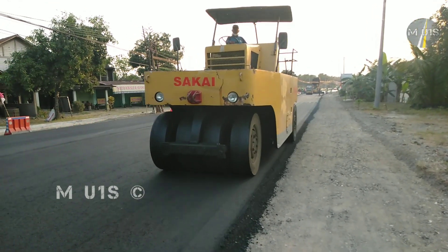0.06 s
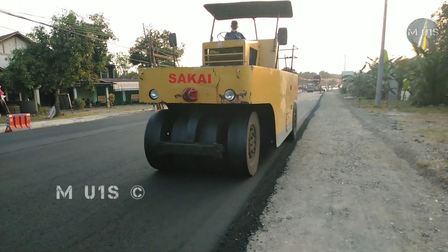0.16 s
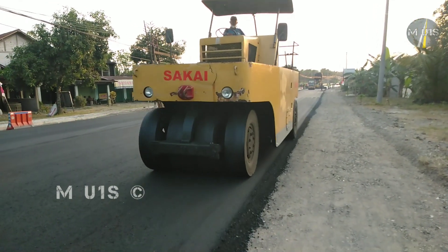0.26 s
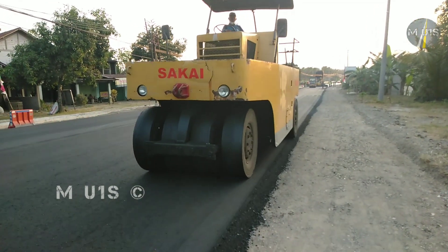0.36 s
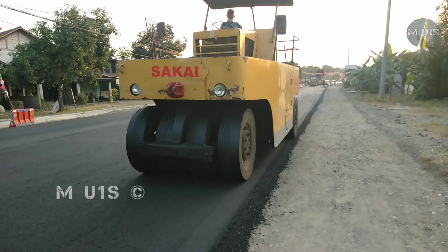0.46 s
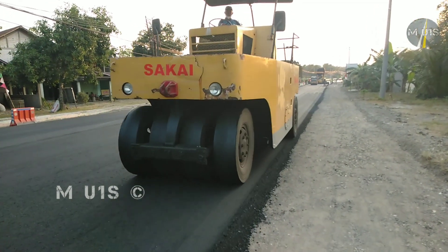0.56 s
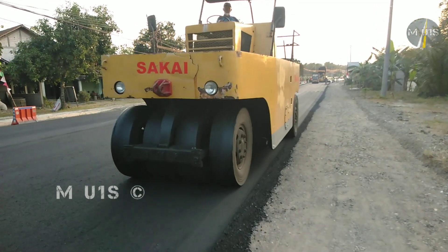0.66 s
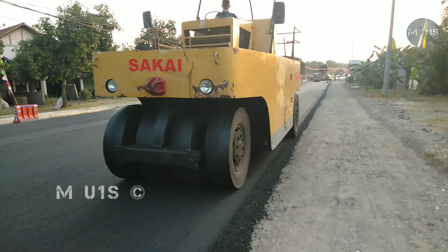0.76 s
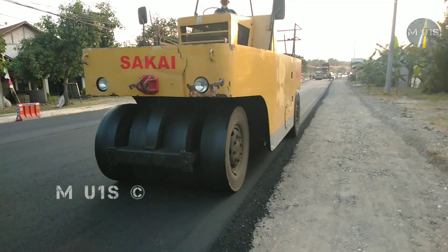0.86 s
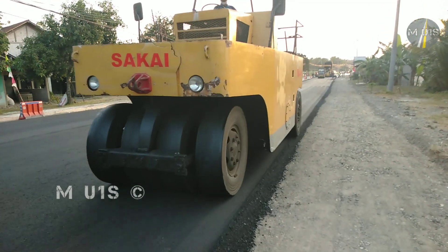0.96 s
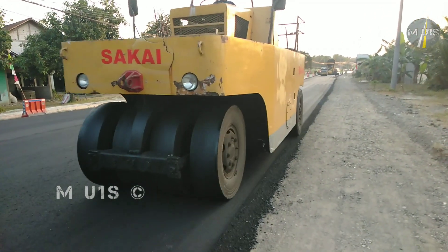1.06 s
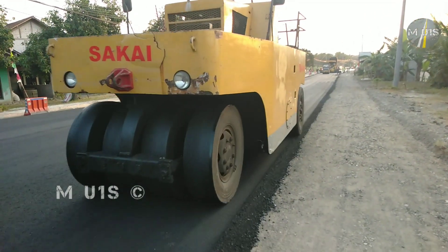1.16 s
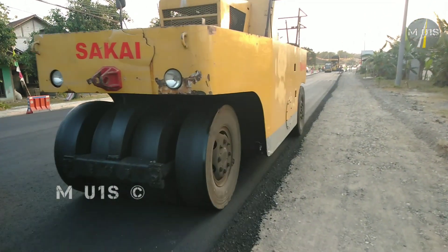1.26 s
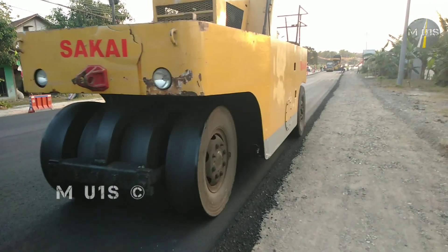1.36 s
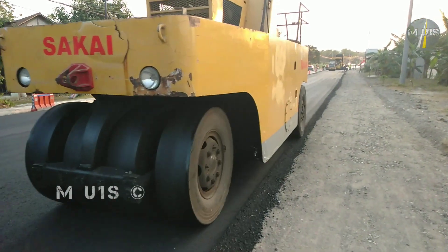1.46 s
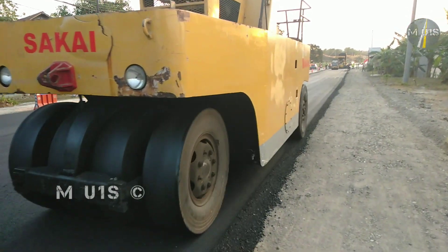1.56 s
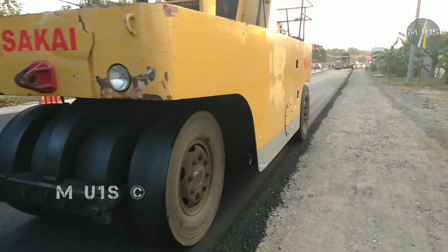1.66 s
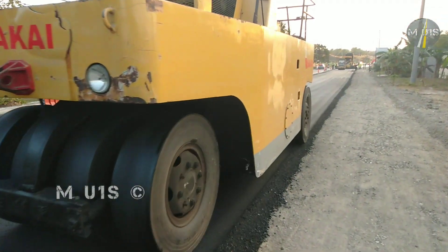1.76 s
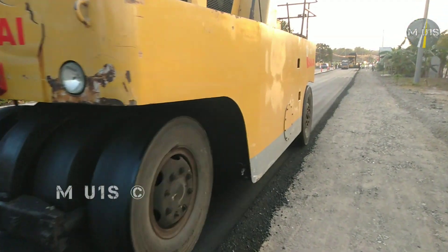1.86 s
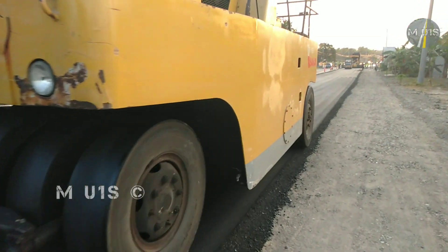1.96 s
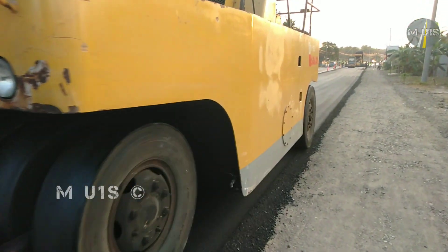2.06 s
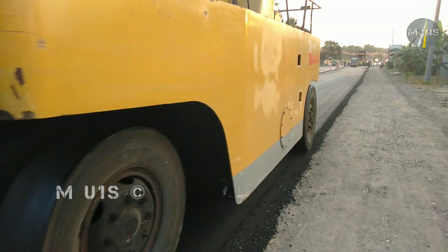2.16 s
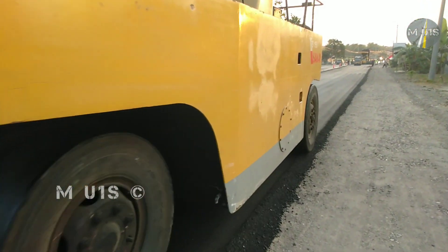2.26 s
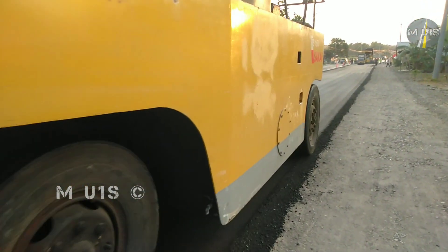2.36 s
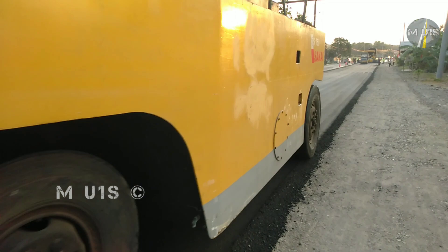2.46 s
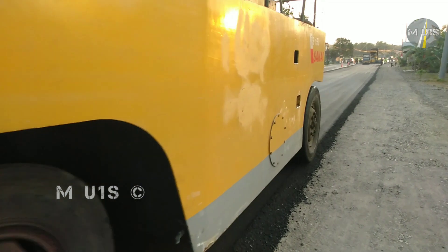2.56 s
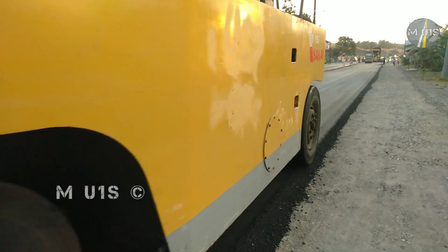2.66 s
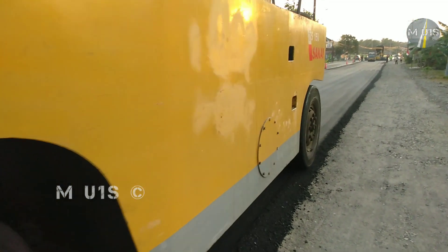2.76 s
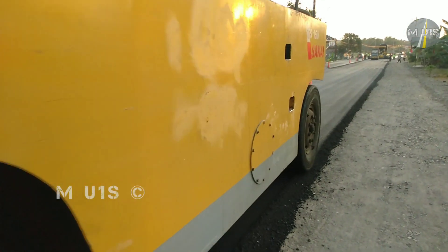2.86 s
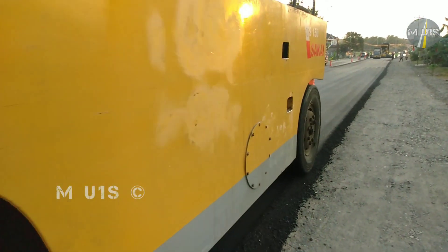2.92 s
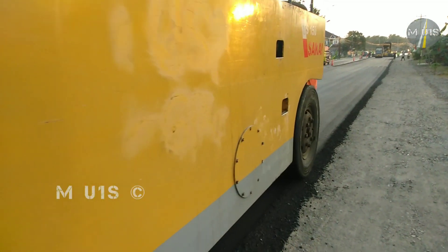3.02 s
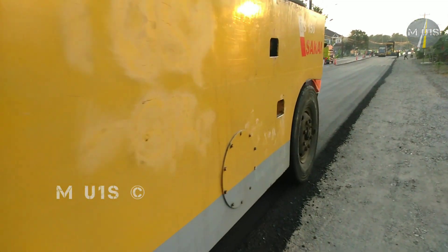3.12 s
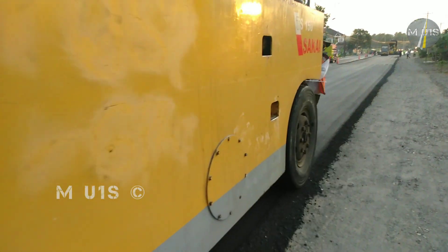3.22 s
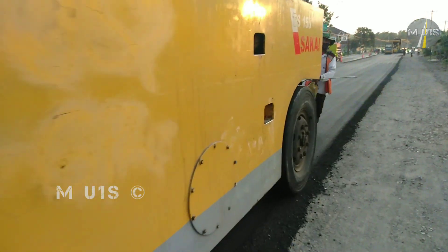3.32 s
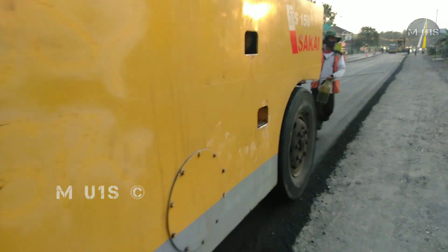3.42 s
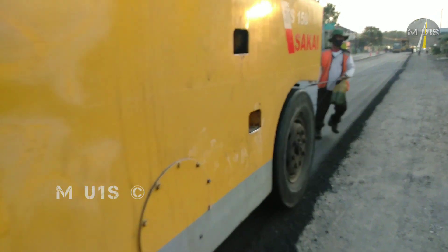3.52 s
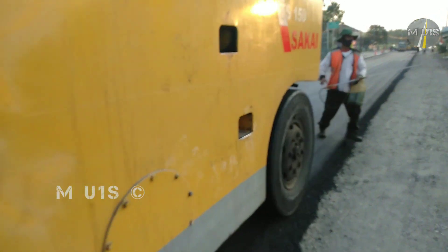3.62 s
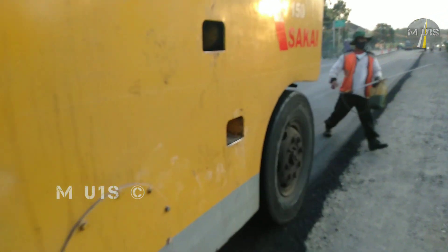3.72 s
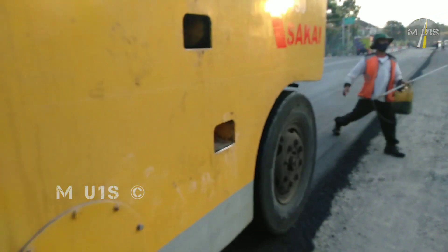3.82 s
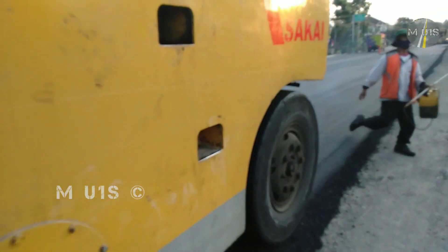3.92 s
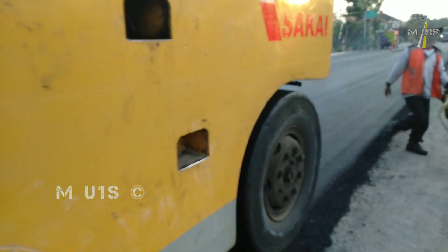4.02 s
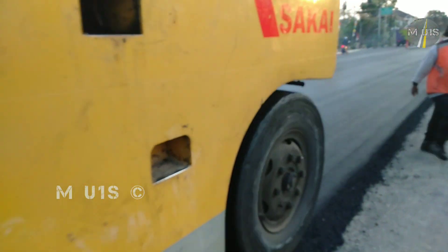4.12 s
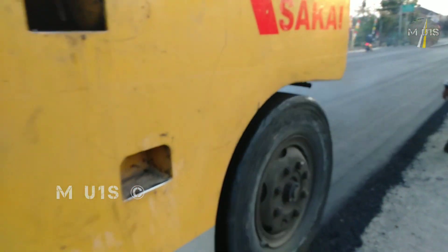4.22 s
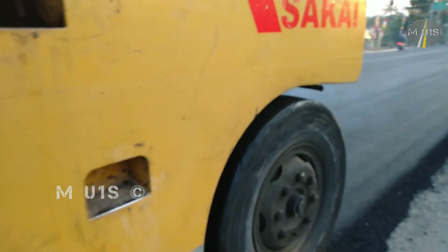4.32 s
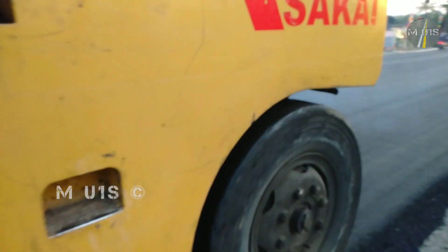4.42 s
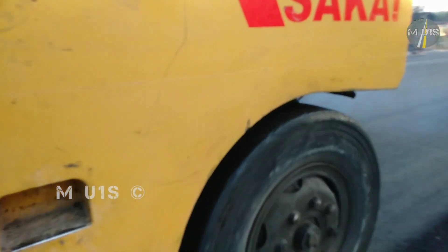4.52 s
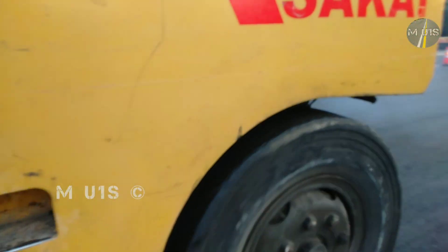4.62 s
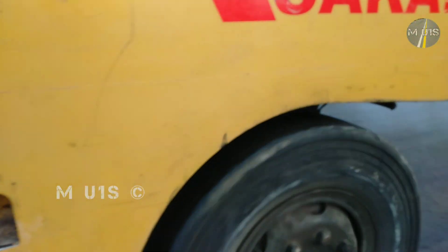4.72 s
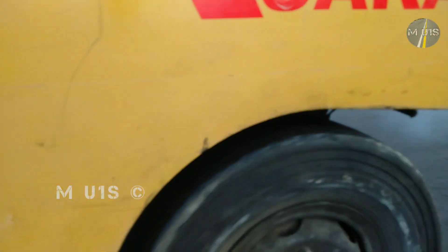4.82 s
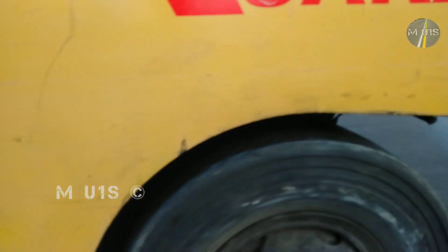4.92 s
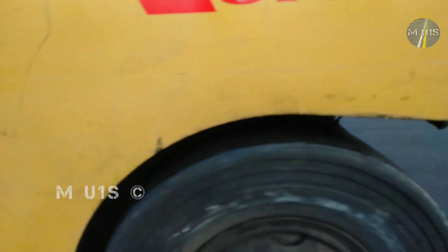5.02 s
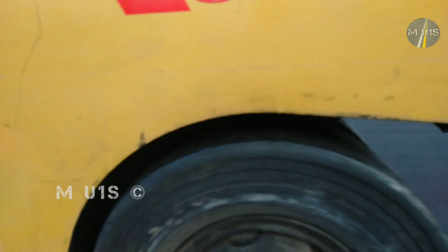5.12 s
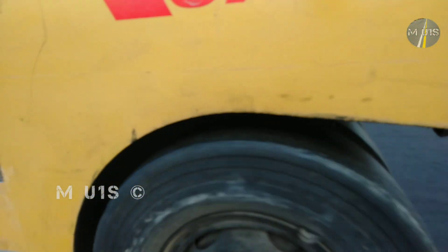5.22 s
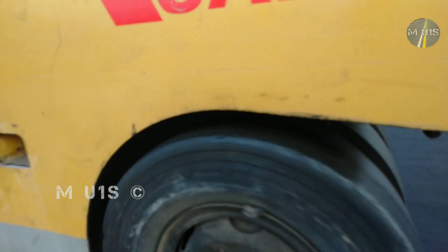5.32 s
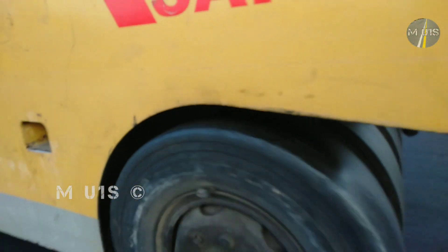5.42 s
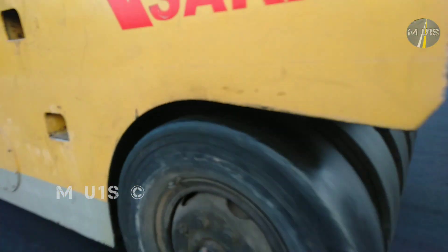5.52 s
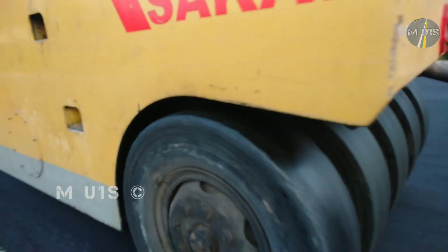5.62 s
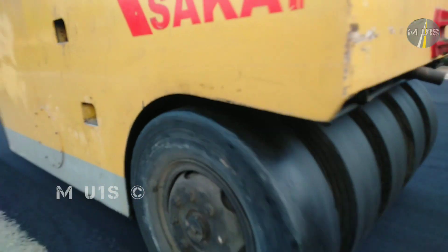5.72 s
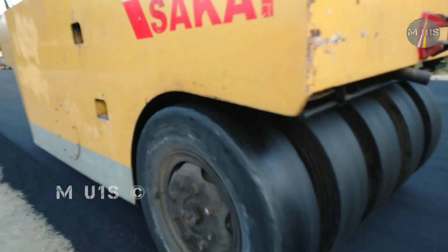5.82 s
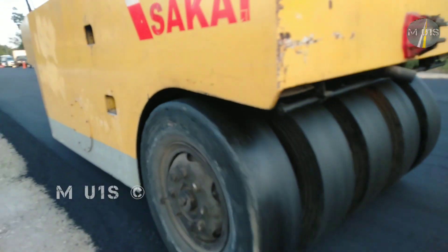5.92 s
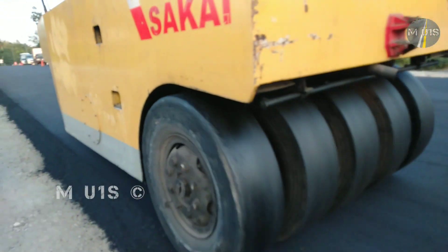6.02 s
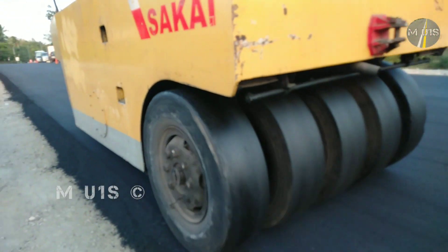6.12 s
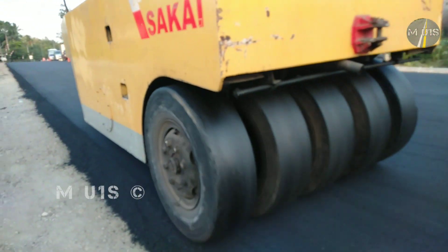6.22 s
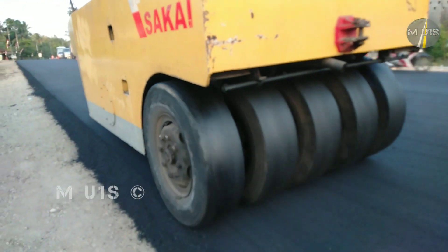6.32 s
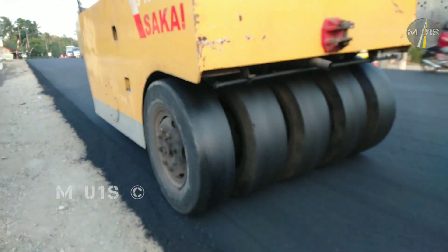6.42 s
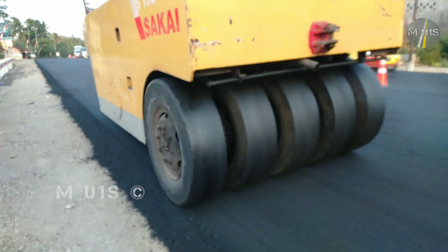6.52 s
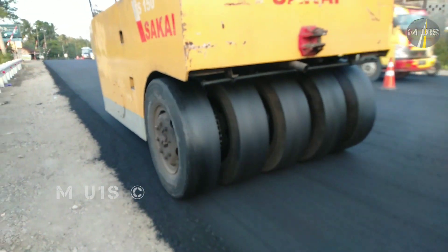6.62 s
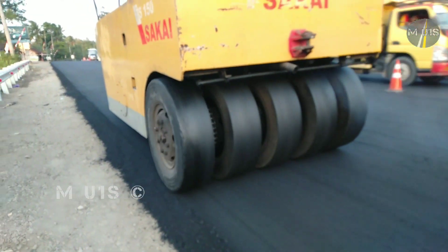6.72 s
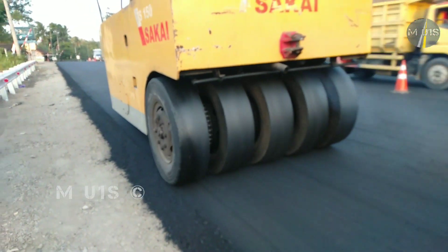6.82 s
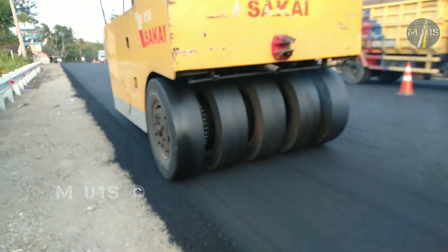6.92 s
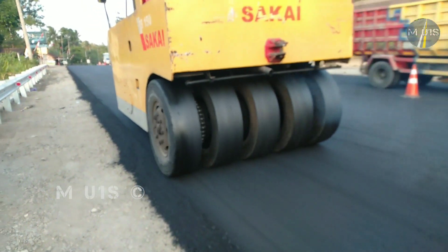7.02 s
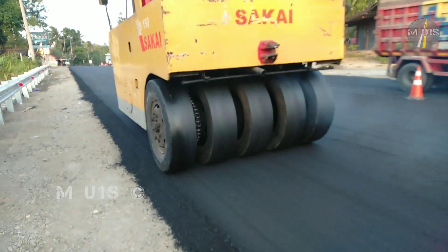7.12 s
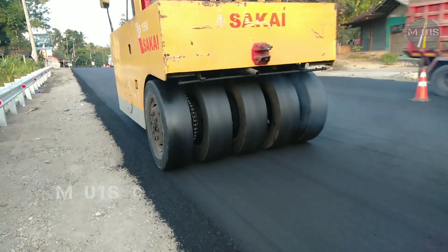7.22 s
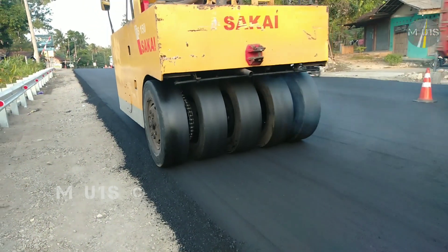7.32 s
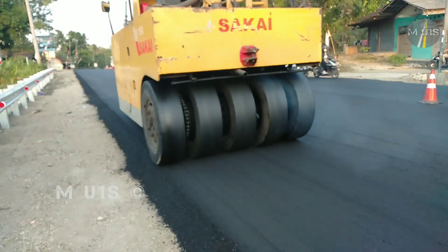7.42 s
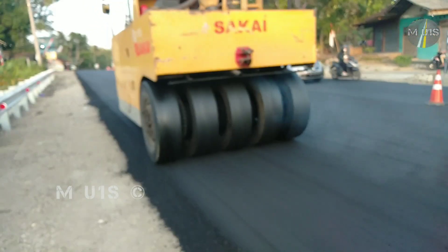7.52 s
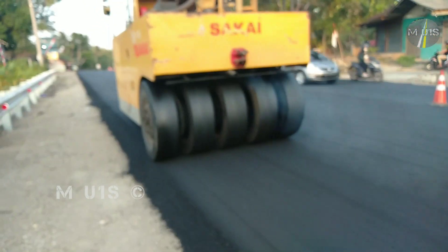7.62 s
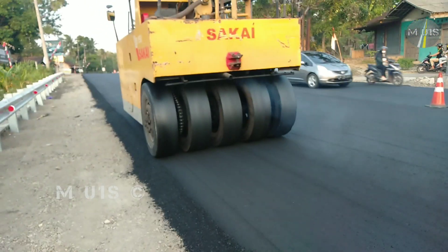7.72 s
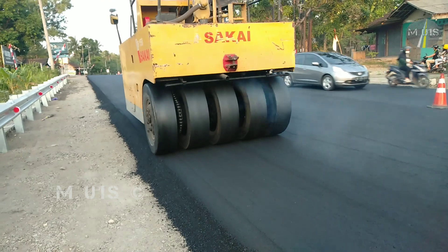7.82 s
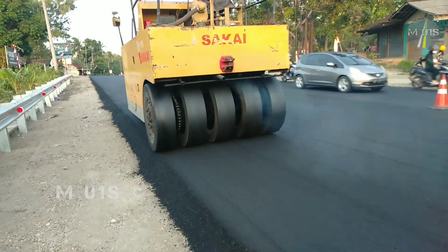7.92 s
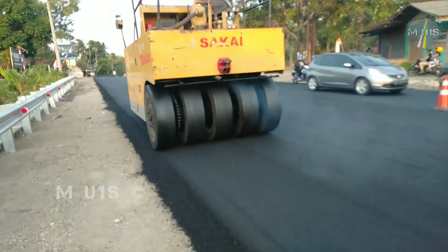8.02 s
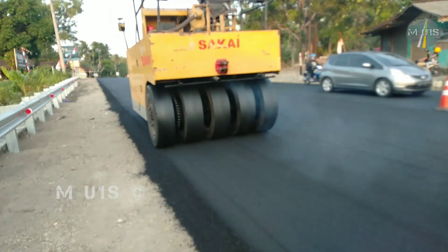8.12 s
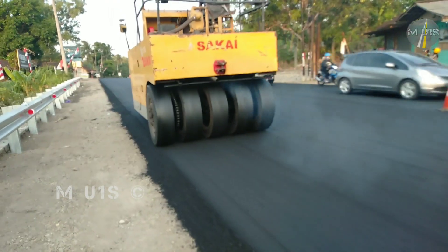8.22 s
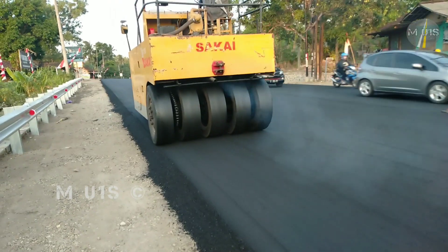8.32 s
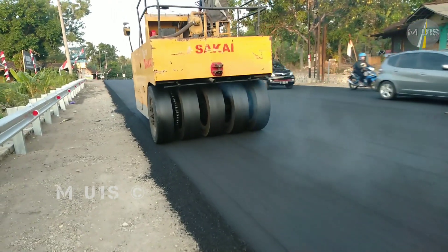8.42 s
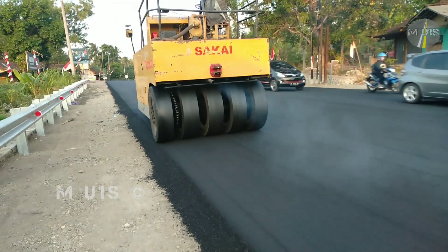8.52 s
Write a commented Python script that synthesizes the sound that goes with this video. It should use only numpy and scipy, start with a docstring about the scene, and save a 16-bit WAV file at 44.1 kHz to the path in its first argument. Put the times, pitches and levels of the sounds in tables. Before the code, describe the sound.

A heavy six-cylinder engine holds one speed while the machine rolls by within a couple of metres, in open air. Fan and pump hums waver around its deep throbbing drone. Clatter, valve tapping and fine ticking peak abreast, with a mid-pitched whine surging in bursts. The engine fades gradually behind brief groans and squeaky chirps, while a lorry's drone and soft car roar pass farther off.

```python
"""A rubber-tyred road roller creeps past, close to the microphone, its six-cylinder diesel held near one speed.
The exhaust hums in firing harmonics; noise shaped by engine blows makes body boom, clatter and a sharp tick.
A fan, a pump and a surging drive whine are wavering tones; resonances swell, hard knocks ring, fittings clank.
The tyres hiss on fresh asphalt, with passages of narrow-band hiss; faint groans and a dry squeak come late.
Behind it, in the open lane, a lorry and a car go by towards the end."""
import sys
import numpy as np
from scipy import signal
from scipy.fft import rfft, irfft, next_fast_len
from scipy.io import wavfile

SR = 44100
rng = np.random.default_rng(int(sys.argv[2]) if len(sys.argv) > 2 else 0)


def log_audio(samples):
    """Write samples as a 16-bit WAV file to the path given in sys.argv[1]."""
    # one column per channel
    frames = np.atleast_2d(samples).T
    # limit to full scale, then quantise
    limited = np.clip(frames, -1, 1)
    pcm = np.round(limited * 32767).astype(np.int16)
    wavfile.write(sys.argv[1], SR, pcm)


N = 377937
CYLINDERS = 6


def from_db(db):
    """Decibels to gain."""
    return 10 ** (np.asarray(db) / 20)


def rms_one(x):
    """Scale to unit power."""
    return x / np.sqrt(np.mean(x ** 2) + 1e-20)


def in_time(rows):
    """Read each column of a curve at every sample; the first column is in seconds."""
    s, *columns = np.transpose(rows)
    return [np.interp(np.arange(N) / SR, s, c) for c in columns]


def coloured(x, spectrum):
    """Filter a sound to a spectrum of relative levels, falling away below its first row; rms 1."""
    hz, db = np.transpose(spectrum)
    size = next_fast_len(N + 4096)
    freqs = np.arange(size // 2 + 1) * SR / size
    gain = from_db(np.interp(np.log(freqs + 1e-3), np.log(hz), db))
    gain = gain * np.minimum(freqs / hz[0], 1) ** 2
    return rms_one(irfft(rfft(x, size) * gain, size)[:N])


def band_noise(hz, width_hz):
    """Noise in one band; rms 1."""
    edges = [hz - width_hz / 2, hz + width_hz / 2]
    band = signal.butter(2, edges, "band", fs=SR, output="sos")
    return rms_one(signal.sosfilt(band, rng.standard_normal(N)))


def drift(rate):
    """Slow random wander of rms 1; a higher rate wanders faster."""
    r = np.exp(-200 * np.pi * rate / SR)   # one step per 100 samples
    steps = rng.standard_normal(N // 100 + 1002)
    slow = signal.lfilter([1], [1, -2 * r, r * r], steps)[1000:]   # drop the filter's start
    return np.interp(np.arange(N) / 100, np.arange(len(slow)), rms_one(slow))


def tone(turns, flutter, rate):
    """A line of rms 1 whose height and phase are shaken at random."""
    angle = 2 * np.pi * (turns + rng.random())
    in_phase = (1 + flutter * drift(rate)) * np.cos(angle)
    return rms_one(in_phase + flutter * drift(rate) * np.sin(angle))


def swell(start_s, end_s, edge_s):
    """Rise, hold and release, with soft edges."""
    t = np.arange(N) / SR
    rise = (1 + np.tanh((t - start_s) / edge_s / 2)) / 2
    release = (1 - np.tanh((t - end_s) / edge_s / 2)) / 2
    return rise * release


def together(gains):
    """Unrelated sounds add in power."""
    return np.sqrt(sum(gain ** 2 for gain in gains))


ROLLER_M_PER_S, TRAFFIC_M_PER_S = 1.33, 8.6


def passing(part, speed=ROLLER_M_PER_S):
    """Gain of a source moving along a straight line past the microphone."""
    abreast_s, db, distance_m, coming_db, going_db = part
    along_m = speed * (np.arange(N) / SR - abreast_s)
    doublings = np.log2(np.hypot(1, along_m / distance_m))
    return from_db(db - np.where(along_m < 0, coming_db, going_db) * doublings)


# Engine speed. Each row: time in seconds, firings per second.
FIRING = [(0.25, 52.12), (0.75, 52.1), (1.25, 52.31), (1.75, 52.16), (2.25, 52.0), (2.75, 51.75),
          (3.25, 51.91), (3.75, 51.79), (4.25, 51.26), (4.75, 51.42), (5.25, 50.98), (5.75, 51.09),
          (6.25, 51.45), (6.75, 51.35), (7.25, 51.12), (7.75, 51.36), (8.25, 51.36)]


def crankshaft():
    """Count engine cycles from the firing rate; every cylinder fires once a cycle."""
    return np.cumsum(in_time(FIRING)[0]) / SR / CYLINDERS


def throbbing(cycles, depth, position):
    """Gain that rises and falls once in each engine cycle."""
    return 1 + depth * np.cos(2 * np.pi * (cycles - position))


# The deepest hum, one line at the firing rate, going by the microphone.
# The row: abreast at seconds, dB there, distance in m, dB lost per doubling of distance coming, and going.
FIRING_HUM_PASS = (3.9, -31.5, 1.3, 6, 3.5)
# A brief dip in that hum. The row: start in seconds, end in seconds, dB.
HUM_DIP = (7.37, 7.8, -20)
# The main hum at twice the firing rate. Each row: time in seconds, level in dB before the throb.
MAIN_HUM = [(0, -30), (.35, -27), (1.0, -32), (1.5, -27.5), (2.4, -29.5), (3.3, -32), (4.2, -33),
            (4.75, -29.5), (5.4, -44), (6.0, -33.5), (6.7, -31.5), (8.57, -36.5)]
# Throb of these two hums. Each row: time in seconds, depth 0-1, position of its peak in the cycle 0-1.
HUM_THROB = [(0, .15, 0.33), (2.2, .17, 0.45), (3, 0.1, .69), (4.4, .15, 0.6), (6, 0, 0.6)]
# Higher harmonics along the flank. Each row: multiple of the firing rate, start in seconds, end in seconds,
# level in dB before the throb.
HUM_SWELLS = [(3, 0.21, 4.1, -42), (3, 2.62, 4.47, -29), (3, 8.12, 8.6, -38), (4, 2.14, 3.8, -40.5),
              (4, 3.9, 4.82, -33), (4, 4.63, 6.4, -41.5), (5, 4.9, 8.6, -43.5)]
HUM_EDGE_S = 0.13
# Lines left between the harmonics by unequal cylinders. Each row: multiple of the cycle rate, level in dB;
# the trailing throb's gain is added to multiples 7 to 11.
UNEVEN = [(5, -49), (7, -46), (8, -44.5), (9, -46), (10, -49.5), (11, -54), (13, -50.5), (14, -49),
          (16, -48), (20, -45), (22, -52.5), (30, -51)]
# The low throb trailing the machine. The row: abreast at seconds, dB added to each line's own,
# distance in m, dB lost per doubling of distance coming, and going.
THROB_PASS = (6.1, 3.7, 1.75, 3, 5.9)


def exhaust(cycles):
    """Firing pulses hum through the silencer; cylinder differences add lines that make the hum throb."""
    dip_start, dip_end, dip_db = HUM_DIP
    deepest_gain = passing(FIRING_HUM_PASS) * from_db(dip_db * swell(dip_start, dip_end, HUM_EDGE_S))
    main_gain = from_db(in_time(MAIN_HUM)[0])
    hum = 0
    for order, gain in [(1, deepest_gain), (2, main_gain)]:
        hum = hum + gain * tone(CYLINDERS * order * cycles, flutter=0.08, rate=3.9)
    flank = 0
    for order, start, end, db in HUM_SWELLS:
        line = tone(CYLINDERS * round(order) * cycles, flutter=0.16, rate=7.0)
        flank = flank + from_db(db) * swell(start, end, HUM_EDGE_S) * line
    trailing = passing(THROB_PASS)
    uneven = 0
    for order, db in UNEVEN:
        gain = trailing if CYLINDERS < order < 2 * CYLINDERS else 1
        uneven = uneven + from_db(db) * gain * tone(round(order) * cycles, flutter=0.35, rate=1.84)
    hum = hum * throbbing(cycles, *in_time(HUM_THROB))
    return hum + flank * throbbing(cycles, depth=0.16, position=0.88) + uneven


# The fan's note as the grilles go by. Each row: time in seconds, pitch in Hz, level in dB.
FAN = [(0, 555.3, -38.5), (.26, 552, -43), (.44, 560, -46), (.66, 548.4, -38.5), (1.35, 556.5, -43),
       (1.9, 557, -48), (2.25, 554, -41), (2.75, 556, -45.5), (3.05, 554.7, -38.5), (3.42, 554, -42),
       (3.72, 554, -37), (3.9, 554, -41.5), (4.15, 542, -40), (4.45, 548, -45), (4.76, 556.5, -40),
       (6, 548, -52), (8.57, 548, -61)]


def fan():
    """Blades chop the cooling air; their note wanders a little."""
    hz, db = in_time(FAN)
    return from_db(db) * tone(np.cumsum(hz) / SR, flutter=0.2, rate=7.0)


def vibration(cycles, repeat):
    """Dense ringing of metal: a share comes back alike on each engine cycle, the rest is new."""
    size = 16384
    one_cycle = rms_one(irfft(np.exp(2j * np.pi * rng.random(size // 8)), size))
    alike = np.interp(cycles % 1 * size, np.arange(size), one_cycle)
    share = np.clip(repeat, 0, 1)
    return np.sqrt(share) * alike + np.sqrt(1 - share) * rng.standard_normal(N)


def blows(cycles, pattern, decay_cycles, bed, scatter_db, rise_s=0.0035):
    """Envelope of blows that come round each cycle, never quite equally hard, over a steady bed."""
    power = 0
    for position, strength in pattern:
        number, age = np.divmod(cycles - position + 2, 1)
        force = from_db(scatter_db * rng.standard_normal(size=128))[number.astype(int)]
        power = power + abs(strength) * force ** 2 * np.exp(-age / decay_cycles)
    r = np.exp(-1 / (rise_s * SR))   # the engine bay takes a moment to fill with each blow
    return np.sqrt(abs(bed) + signal.lfilter([1 - r], [1, -r], power))


# Blows on the block. Each row: position in the engine cycle 0-1, relative power.
BLOCK_BLOWS = [(0.101, 0.64), (.27, 0.25), (0.441, 0.26), (.6, 0.66), (0.762, 1), (.93, 0.76)]
# Spectra of the boom, clatter and spit. Each row: frequency in Hz, relative level in dB per Hz.
BOOM = [(18, -12), (33, -13), (45, -9), (70, -5.5), (110, 1.5), (170, -0.5), (220, 0), (290, -4.5),
        (380, -11.5), (520, -15), (900, -62.5)]
CLATTER = [(250, -8.5), (400, -2.5), (480, -4), (580, -1), (700, 0.5), (860, 0.5), (980, -4), (1150, -4.5),
           (1350, -21), (1800, -17.5), (3500, -76)]
SPIT = [(3000, -11), (4400, -3.5), (5400, 3.5), (6300, -3.5), (7800, 2.5), (9500, -2.5), (12000, -17),
        (15500, -22)]
# Body, block and the opening in the side going by. Each: abreast at seconds, dB there, distance in m,
# dB lost per doubling of distance coming, and going.
BOOM_PASS = (3.5, -31, 3, 9, 4)
CLATTER_PASS = (3.5, -30.5, 4, 11.5, 6)
SPIT_PASS = (3.5, -62.5, 0.83, 11, 17)


def body_boom(cycles):
    """Combustion shakes the steel body, a low boom over a strong steady bed."""
    envelope = blows(cycles, BLOCK_BLOWS, decay_cycles=0.028, bed=1.0, scatter_db=3.0)
    return passing(BOOM_PASS) * coloured(vibration(cycles, repeat=0.16) * envelope, BOOM)


def block_clatter(cycles):
    """The same blows ring on longer in the engine block."""
    envelope = blows(cycles, BLOCK_BLOWS, decay_cycles=0.42, bed=0.27, scatter_db=1.74)
    return passing(CLATTER_PASS) * coloured(vibration(cycles, repeat=0.28) * envelope, CLATTER)


def firing_spit(cycles):
    """Each firing spits a short burst of noise through an opening in the side."""
    envelope = blows(cycles, BLOCK_BLOWS, decay_cycles=0.038, bed=0.01, scatter_db=2.0, rise_s=0.0015)
    return passing(SPIT_PASS) * coloured(rng.standard_normal(N) * envelope, SPIT)


# Blows of the valves. Each row: position in the engine cycle 0-1, relative power.
VALVE_BLOWS = [(.1, 0.25), (.265, 1.0), (.35, 0.44), (.6, 0.32), (.765, 0.27), (.93, 0.36)]
# Spectrum of the valves. Each row: frequency in Hz, relative level in dB per Hz.
VALVES = [(800, -24.5), (1300, 3), (1700, 1.5), (1850, -2.5), (1950, -0.5), (2100, -3), (2450, -6.5),
          (2750, -5.5), (3150, -7.5), (3600, -14.5), (4200, -23.5), (5000, -42), (8000, -60)]
# Valves going by. The row: abreast at seconds, dB there, distance in m, dB lost per doubling coming, and going.
VALVE_PASS = (2.5, -39, 3, 11, 6.5)


def valve_taps(cycles):
    """Valves tap the metal around them in short rings."""
    envelope = blows(cycles, VALVE_BLOWS, decay_cycles=0.085, bed=0.2, scatter_db=1.7)
    return passing(VALVE_PASS) * coloured(vibration(cycles, repeat=0.12) * envelope, VALVES)


# Blows of the knock. Each row: position in the engine cycle 0-1, relative power.
KNOCK_BLOWS = [(.76, 0.58), (.83, 0.15)]
# Ring of the knock. Each row: frequency in Hz, relative level in dB per Hz.
KNOCK = [(500, -18), (750, -8.5), (1000, -12), (1150, 0), (1400, 1), (1600, -6.5), (2000, -10),
         (3000, -17.5), (4500, -58)]
# Knock going by. The row: abreast at seconds, dB there, distance in m, dB lost per doubling coming, and going.
KNOCK_PASS = (4.5, -40.5, 1.5, 3, 10.5)


def engine_knock(cycles):
    """A knock late in each cycle rings in the metal."""
    envelope = blows(cycles, KNOCK_BLOWS, decay_cycles=0.12, bed=0.052, scatter_db=1.5)
    return passing(KNOCK_PASS) * coloured(vibration(cycles, repeat=0.36) * envelope, KNOCK)


# Blows of the injector. Each row: position in the engine cycle 0-1, relative power.
TICK_BLOWS = [(.27, 1.0), (.31, 0.31), (.36, 0.16), (.77, 0.091)]
# Extra level of single ticks. Each row: time in seconds, extra dB, 0 for an ordinary one.
TICK_ACCENTS = [(2.57, 5), (2.805, 2), (3.265, 4), (3.38, 4), (3.495, 3), (3.615, 4), (3.783, 7), (4.43, 8),
                (4.668, 6), (4.779, 3), (5.012, 2.5), (5.133, 4.5), (5.248, 3.5), (5.367, 4), (5.598, 2),
                (5.715, 0), (6.18, 3)]
TICK_ACCENT_S = 0.02
# Spectrum of the tick. Each row: frequency in Hz, relative level in dB per Hz.
TICK = [(1000, 5), (2800, 17), (3600, 15), (4400, 1), (5600, 5), (6300, -7), (7000, 0.5), (7700, 5),
        (9500, -9), (12000, -25), (15500, -23)]
# Two openings in the side let the tick out. Each row: abreast at seconds, dB there, distance in m,
# dB lost per doubling of distance coming, and going.
TICK_PASSES = [(3.1, -56.5, 1.15, 9, 11), (4.85, -57.5, 0.68, 11, 4.7)]


def injector_tick(cycles):
    """An injector taps one sharp tick a cycle, with weaker ones after it."""
    t = np.arange(N) / SR
    envelope = blows(cycles, TICK_BLOWS, decay_cycles=0.051, bed=0.014, scatter_db=1.0, rise_s=0.0014)
    extra_db = sum(db * np.exp(-((t - s) / TICK_ACCENT_S) ** 2) for s, db in TICK_ACCENTS)
    tick = rng.standard_normal(N) * envelope * from_db(extra_db)
    return together(map(passing, TICK_PASSES)) * coloured(tick, TICK)


def engine(cycles):
    """Combustion shakes body and block; valves, a knock, an injector and spitting add to it."""
    low = body_boom(cycles) + block_clatter(cycles)
    return low + valve_taps(cycles) + firing_spit(cycles) + engine_knock(cycles) + injector_tick(cycles)


# Echo of the engine off the road surface. Each row: time in seconds, lag in ms, strength 0-1.
GROUND = [(0, 1.5, 0.35), (1.2, 1.58, 0.1), (2.2, 1.56, 0.19), (3.2, 1.51, 0.032), (5.6, 1.074, 0.025),
          (6.5, 1.15, 0.11), (7.3, 1.3, 0.3), (8.57, 0.72, 0.041)]


def off_the_road(x):
    """The sound and its echo from the asphalt form a comb that shifts as the lag changes."""
    lag_ms, strength = in_time(GROUND)
    n = np.arange(N)
    echo = np.interp(n - lag_ms * SR / 1000, n, x)
    return (x + strength * echo) / np.sqrt(1 + strength ** 2)


# The pump's hum. Each row: time in seconds, pitch in Hz, level in dB.
PUMP = [(0, 283, -44.5), (.7, 275.7, -41), (1.5, 278.7, -37.5), (2.4, 273.8, -45.5), (2.9, 277.8, -37),
        (3.4, 275.7, -44.5), (3.9, 282.2, -39.5), (4.5, 272.7, -47), (5.8, 273.8, -42),
        (8.57, 272.7, -50.5)]


def pump():
    """The pump gives a slightly rough, wavering hum."""
    hz, db = in_time(PUMP)
    return from_db(db) * tone(np.cumsum(hz) / SR, flutter=0.22, rate=5.2)


# The whine between surges. The row: abreast at seconds, dB there before the throb, distance in m,
# dB lost per doubling of distance coming, and going.
WHINE_PASS = (4.5, -41.5, 2.5, 4.5, 6.5)
# Surges of the whine. Each row: start in seconds, end in seconds, pitch in Hz, level in dB before the throb.
WHINE_SURGES = [(1.93, 2.098, 825, -35.5), (2.1, 2.33, 834, -36), (2.69, 2.934, 828, -33.5),
                (4.111, 4.198, 817, -31.5), (4.252, 4.394, 817, -32.5), (4.469, 4.563, 845, -32.5),
                (4.56, 4.679, 818, -33.5), (4.758, 4.925, 823.5, -39), (4.914, 5.126, 823, -37),
                (5.27, 5.405, 829, -35), (5.42, 6.548, 818, -42), (5.909, 6.004, 858, -38.5),
                (6.038, 6.303, 840, -35)]
WHINE_IDLE_HZ, WHINE_WAVER_HZ, WHINE_EDGE_S = 826.7, 3.3, 0.012
WHINE_THROB, WHINE_THROB_AT = 0.39, 0.2   # depth 0-1, position in the cycle 0-1


def whine(cycles):
    """The drive sings a wavering line that surges, and throbs twice in each engine cycle."""
    waver = np.cumsum(WHINE_WAVER_HZ * drift(6.27)) / SR
    steady = passing(WHINE_PASS)
    surges = [(hz, from_db(db) * swell(start, end, WHINE_EDGE_S)) for start, end, hz, db in WHINE_SURGES]
    gain = together([steady] + [surge for _, surge in surges])
    # the strongest part pulls the pitch towards its own
    weighted_hz = WHINE_IDLE_HZ * steady ** 2 + sum(hz * surge ** 2 for hz, surge in surges)
    pitch = weighted_hz / gain ** 2
    throb = 1 + WHINE_THROB * np.cos(4 * np.pi * (cycles - WHINE_THROB_AT))
    return gain * throb * tone(np.cumsum(pitch) / SR + waver, flutter=0.25, rate=18.0)


# Booming and ringing resonances in passing, some perhaps the lorry's. Each row: pitch in Hz, level in dB,
# loudest at seconds, half duration in seconds, sharpness Q.
RESONANCES = [(180, -41, 1.5, 2.2, 3.6), (191, -36.5, 2.85, 0.94, 8.7), (255.5, -34.5, 5.36, 0.68, 5.1),
              (344, -37.5, 6.17, 0.31, 4.75), (426, -43, 8.35, 1.3, 7.1), (324, -42, 7.7, 0.19, 8.9),
              (190, -38, 7.37, 0.49, 4.5), (486, -40, 4.9, 0.66, 9.9), (565, -40.5, 3.47, 0.55, 10),
              (256, -40.5, 3.5, 0.63, 5.2), (352, -45, 1.9, 0.54, 5.6), (221, -42.5, 1.8, 0.28, 9),
              (607, -44, 1.3, 1.1, 5.7), (710, -49, 1.45, .15, 19), (1114, -41.5, 5.74, 0.2, 12),
              (1252, -43, 5.17, 0.32, 25.7), (1306, -58, 1.7, 0.15, 14), (1955, -46, 4.36, 0.72, 24),
              (1930, -49.5, 1.6, 0.2, 35), (2195, -49.5, 4.26, 0.8, 16)]


def resonances(cycles):
    """Noise pulsed in the valves' rhythm rings in narrow bands that swell and fade in passing."""
    t, out = np.arange(N) / SR, np.zeros(N)
    shake = rng.standard_normal(N) * blows(cycles, VALVE_BLOWS, decay_cycles=0.16, bed=0.28, scatter_db=0.5)
    for hz, db, s, half_s, q in RESONANCES:
        ringing = signal.lfilter(*signal.iirpeak(hz, q, fs=SR), shake)
        ringing = signal.lfilter(*signal.iirpeak(hz, q / 2, fs=SR), ringing)
        nearness = np.exp(-0.5 * ((t - s) / half_s) ** 2)
        out += from_db(db) * nearness * rms_one(ringing)
    return out


# Spectrum of the rolling hiss. Each row: frequency in Hz, relative level in dB per Hz.
HISS = [(2000, -19), (4500, 3), (5600, 2.5), (6300, -3.5), (6900, -2.5), (7600, 3), (8500, 2), (10000, -3),
        (12000, -15), (15500, -23)]
# Front and rear tyres going by. Each row: abreast at seconds, dB there, distance in m,
# dB lost per doubling of distance coming, and going.
TYRE_PASSES = [(2.9, -63.5, 1.46, 7.5, 4.5), (4.85, -61.5, 0.72, 8.5, 19)]
GRIT_PER_S, GRIT_SHARE = 350, 0.4   # crackles per second, their share of the hiss's power 0-1


def tyres():
    """Warm asphalt peels off the smooth tyres in a hiss with crackling grit."""
    grit = rms_one((rng.random(N) < GRIT_PER_S / SR) * rng.uniform(-0.86, 1, N))
    peeling = np.sqrt(GRIT_SHARE) * grit + np.sqrt(1 - GRIT_SHARE) * rng.standard_normal(N)
    return together(map(passing, TYRE_PASSES)) * coloured(peeling, HISS)


# Passages of hiss in narrow bands, from tyres, the engine's side opening and passing traffic.
# Each row: start in seconds, end in seconds, centre in Hz, width in Hz, level in dB.
HISS_PASSAGES = [(1.62, 1.95, 8400, 1200, -70), (1.95, 2.27, 6100, 700, -72), (2.56, 3.19, 8850, 1600, -69),
                 (3.148, 3.861, 8200, 1800, -66), (4.9, 5.9, 7760, 700, -72), (5.9, 8.6, 7600, 500, -79),
                 (6.5, 7.9, 8400, 1100, -77), (6.9, 7.7, 8084, 900.5, -74),
                 (7.296, 8.102, 10220, 1500, -78)]
PASSAGE_EDGE_S = 0.015


def hiss_passages():
    """Bands of noise come and go, each at its own height."""
    out = np.zeros(N)
    for start, end, hz, width_hz, db in HISS_PASSAGES:
        out += from_db(db) * swell(start, end, PASSAGE_EDGE_S) * band_noise(hz, width_hz)
    return out


def flickering_hiss():
    """Rolling hiss and narrow-band passages flicker together in level."""
    flicker_db = 0.71 * drift(40)
    return (tyres() + hiss_passages()) * from_db(flicker_db)


# Spectrum of the road roar. Each row: frequency in Hz, relative level in dB per Hz.
ROAD = [(30, -23), (70, -12), (150, -11.5), (330, 12), (500, -1), (750, -11), (1000, -1.5), (1500, -4),
        (3000, -20.5), (4500, -46), (9000, -45), (15500, -59)]
# Roar of a lorry and a car in the open lane. Each row: abreast at seconds, dB there, distance in m,
# dB lost per doubling of distance coming, and going.
VEHICLES = [(7.25, -36, 4.4, 3, 5.1), (8.55, -39, 7, 12, 6.6)]
# The lorry's drone and body rattle, then traffic tyre hiss, still growing at the end.
# Each: abreast at seconds, dB there, distance in m, dB lost per doubling of distance coming, and going;
# the drone's dB is that of its lower line.
LORRY_DRONE_PASS = (7.5, -39, 4, 9.5, 17)
LORRY_RATTLE_PASS = (7.0, -58.5, 5, 5, 16)
TRAFFIC_HISS_PASS = (9, -71.5, 6.5, 4, 4)
LORRY_HZ = 70
LORRY_BOOM_HZ, LORRY_BOOM_DB = 167.3, -4.5   # exhaust boom; dB relative to the drone's lower line
LORRY_RATTLE_FLICKER_DB = 3.5


def lorry():
    """The lorry drones on two lines, its exhaust booms and its body rattles."""
    turns = np.cumsum(LORRY_HZ * (1 + 0.0081 * drift(0.52))) / SR
    drone = tone(turns, flutter=0.23, rate=8.5) + from_db(1.5) * tone(2 * turns, flutter=0.5, rate=5.5)
    boom_edges = [0.92 * LORRY_BOOM_HZ, 0.987 * LORRY_BOOM_HZ]
    boom_band = signal.butter(2, boom_edges, "band", fs=SR, output="sos")
    boom = rms_one(signal.sosfilt(boom_band, rng.standard_normal(N)))
    low = passing(LORRY_DRONE_PASS, TRAFFIC_M_PER_S) * (drone + from_db(LORRY_BOOM_DB) * boom)
    flicker = from_db(LORRY_RATTLE_FLICKER_DB * drift(30))
    rattle = passing(LORRY_RATTLE_PASS, TRAFFIC_M_PER_S) * flicker * band_noise(hz=2890, width_hz=950)
    return low + rattle


def traffic():
    """Roar of both vehicles in the open lane, treble tyre hiss, and the lorry's own sounds."""
    gain = together(passing(vehicle, TRAFFIC_M_PER_S) for vehicle in VEHICLES)
    roar = gain * coloured(rng.standard_normal(N), ROAD)
    hiss = passing(TRAFFIC_HISS_PASS, TRAFFIC_M_PER_S) * band_noise(hz=8400, width_hz=3100)
    return roar + hiss + lorry()


# Hard engine knocks while approaching, about one a cycle. Each row: time in seconds, level in dB.
HARD_KNOCKS = [(0.201, -31), (0.315, -34), (0.43, -33), (0.543, -36), (0.664, -39), (0.888, -31),
               (1.011, -27.5), (1.128, -32), (1.239, -31), (1.355, -30), (1.467, -28), (1.584, -31),
               (1.851, -28), (2.155, -26)]
# Their ringing modes. Each row: pitch in Hz, dB added to the knock's.
HARD_KNOCK_MODES = [(1140, -3.5), (1190, -14.5), (1270, -12), (1330, -7.5), (1400, -11.5)]
# ring time to -60 dB, nominal gap between repeats, dB added for each repeat
HARD_KNOCK_T60_S, REPEAT_GAP_S, REPEAT_DB = 0.074, 0.0092, -5


def hard_knocks():
    """Each knock repeats twice, ringing at 1.1-1.4 kHz; no two excite the modes alike."""
    strikes = []
    for knock_s, knock_db in HARD_KNOCKS:
        for k in range(3):
            delay_s = k * REPEAT_GAP_S * rng.uniform(0.8, 1.3)
            strikes.append((knock_s + delay_s, knock_db + k * REPEAT_DB))
    s, db = np.transpose(strikes)
    out, r = np.zeros(N), from_db(-60 / (HARD_KNOCK_T60_S * SR))
    for hz, mode_db in HARD_KNOCK_MODES:
        clicks, w = np.zeros(N), 2 * np.pi * hz / SR
        force = from_db(db + mode_db + rng.normal(0, 2.5, len(s)))
        clicks[(s * SR).astype(int)] = force * rng.choice([-1, 1], len(s))
        # each click starts a decaying sine; the tiny offset keeps the filter from stalling
        out += signal.lfilter([0, np.sin(w)], [1, -2 * r * np.cos(w), r * r], clicks + 1e-18)
    return out


# Bands that turn hollow. Each row: centre in Hz, depth in dB, deepest at seconds, half duration in seconds.
HOLLOWS = [(1040, -11, 1.6, 0.18), (1560, -2, 2.9, 0.55), (487, -11, 5.8, 0.24), (507, -3.5, 6.6, 0.8),
           (1200, -6, 6.94, 0.22), (1350, -6, 7.49, 0.18), (2170, -2.5, 8.3, .7)]
HOLLOW_Q = 9.3


def hollowed(x):
    """Reflections cancel a narrow band for a while, so the noise turns hollow."""
    t = np.arange(N) / SR
    for hz, db, s, half_s in HOLLOWS:
        band = signal.lfilter(*signal.iirpeak(hz, HOLLOW_Q, fs=SR), x)
        depth_db = db * np.exp(-0.5 * ((t - s) / half_s) ** 2)
        x = x + (from_db(depth_db) - 1) * band
    return x


# Clanks of loose fittings. Each row: time in seconds, ring in Hz, level in dB before the soft rise trims it.
CLANKS = [(3.086, 1260, -28), (3.372, 2960, -42), (5.017, 1934, -38), (5.289, 1309, -32),
          (5.413, 1302, -29.5), (5.822, 1955, -38), (7.583, 3057, -48), (7.687, 3000, -48),
          (8.282, 3057, -56)]
CLANK_RISE_S, CLANK_T60_S = 0.0027, 0.17


def clanks():
    """Loose fittings are jolted and ring briefly, each a decaying sine."""
    out = np.zeros(N)
    for s, hz, db in CLANKS:
        age = np.maximum(np.arange(N) / SR - s, 0)
        decay = from_db(db - 60 * np.minimum(age / CLANK_T60_S, 2))
        rise = 1 - np.exp(-age / CLANK_RISE_S)
        out += decay * rise * np.sin(2 * np.pi * hz * age)
    return out


# Brief, faint groans. Each row: start in seconds, end in seconds, pitch in Hz, level in dB.
GROANS = [(4.63, 4.93, 689, -38), (5.893, 5.995, 650, -35.5), (6.84, 6.958, 680, -35.5)]
GROAN_EDGE_S = 0.012


def groans():
    """A few short, fluttering notes sound as the machine rolls away."""
    t, out = np.arange(N) / SR, np.zeros(N)
    for start, end, hz, db in GROANS:
        out += from_db(db) * swell(start, end, GROAN_EDGE_S) * tone(hz * t, flutter=0.45, rate=14.0)
    return out


# A dry squeak at the rear wheels. Each row: start in seconds, end in seconds, level in dB.
SQUEAKS = [(6.02, 6.04, -46), (6.094, 6.114, -47), (6.157, 6.196, -46), (6.212, 6.237, -47),
           (6.263, 6.276, -44), (6.329, 6.342, -50), (6.39, 6.407, -50), (6.551, 6.59, -50)]
SQUEAK_HZ, SQUEAK_EDGE_S, SQUEAK_WAVER_HZ = 2690, 0.0032, 18


def squeak():
    """Rubbing parts at the rear stick and slip in an uneven run of short, wavering chirps."""
    gain = together(from_db(db) * swell(start, end, SQUEAK_EDGE_S) for start, end, db in SQUEAKS)
    pitch = SQUEAK_HZ + SQUEAK_WAVER_HZ * drift(30)
    return gain * tone(np.cumsum(pitch) / SR, flutter=0.42, rate=70.0)


def scene():
    """One crankshaft times the exhaust, engine, resonances and whine's throb; the open lane lies behind."""
    cycles = crankshaft()
    noise = hollowed(off_the_road(engine(cycles)) + resonances(cycles) + traffic())
    tones = exhaust(cycles) + fan() + pump() + whine(cycles) + groans() + squeak()
    return (noise + tones + flickering_hiss() + hard_knocks() + clanks())[None]


MICROPHONE_HISS_DB, CUTOFF_HZ = -71.5, 15500


def record(dry):
    """The microphone adds a faint hiss; the top is cut steeply."""
    noisy = dry + from_db(MICROPHONE_HISS_DB) * rng.standard_normal(N)
    steep_cut = signal.ellip(12, 0.1, 90, CUTOFF_HZ, fs=SR, output="sos")
    return signal.sosfilt(steep_cut, noisy)


dry = scene()
out = record(dry)
log_audio(out)
```